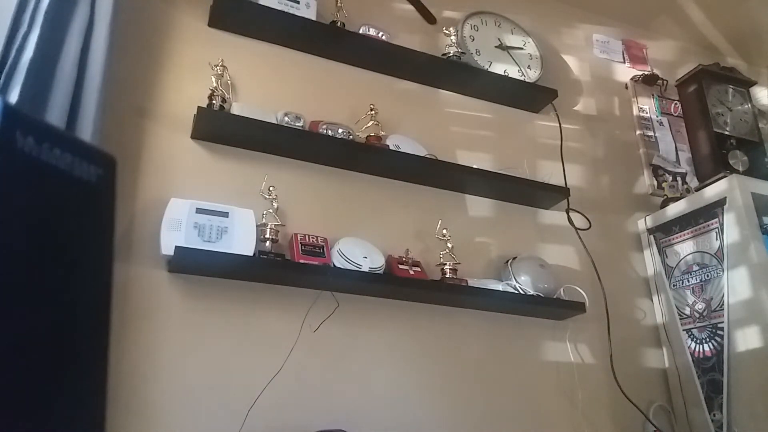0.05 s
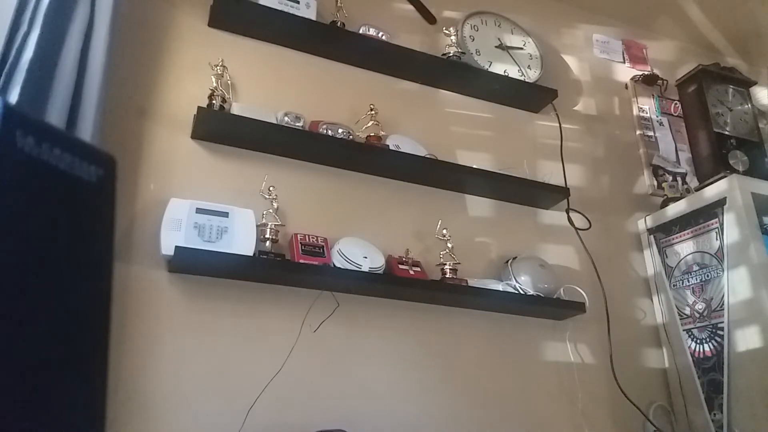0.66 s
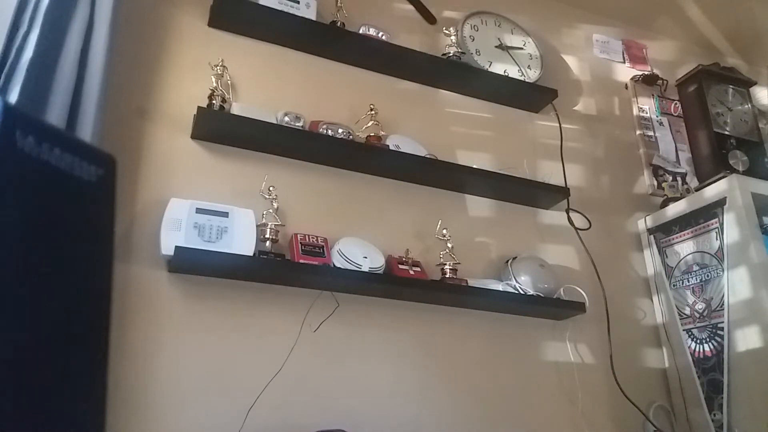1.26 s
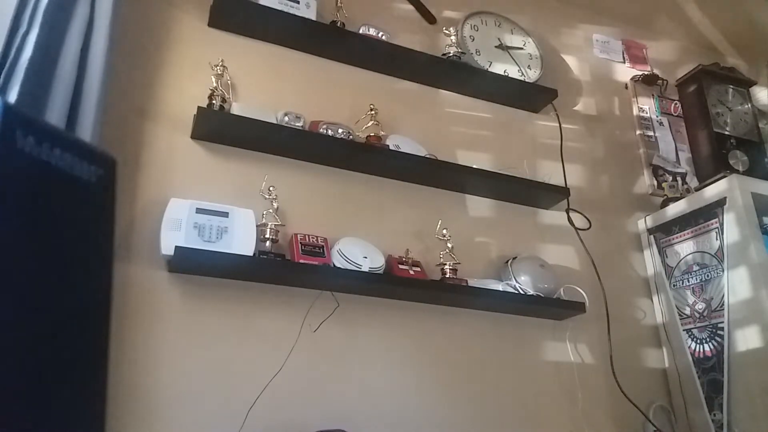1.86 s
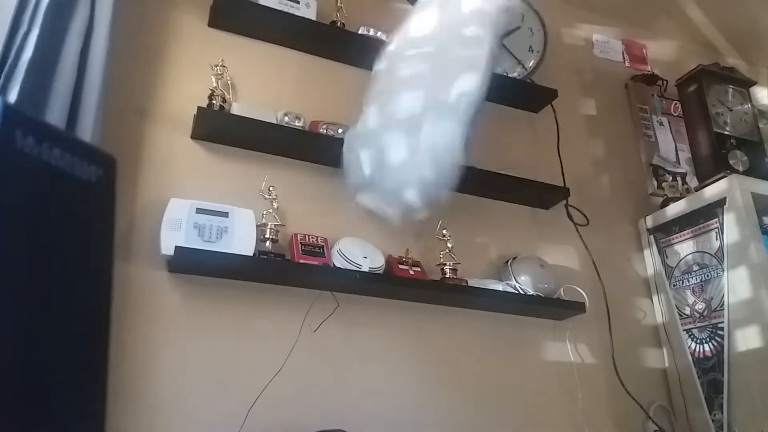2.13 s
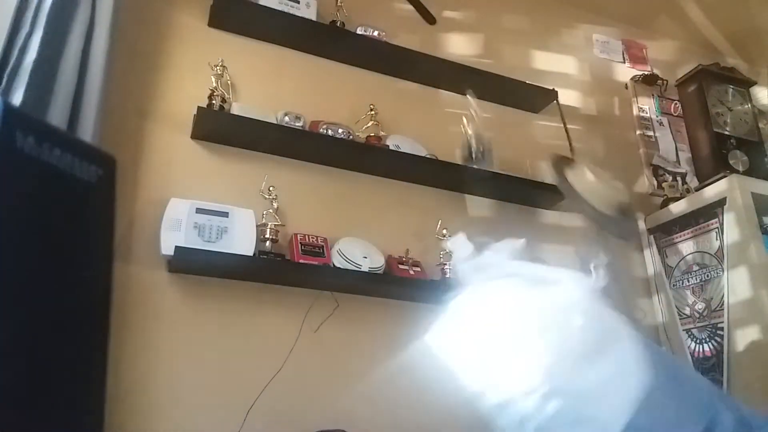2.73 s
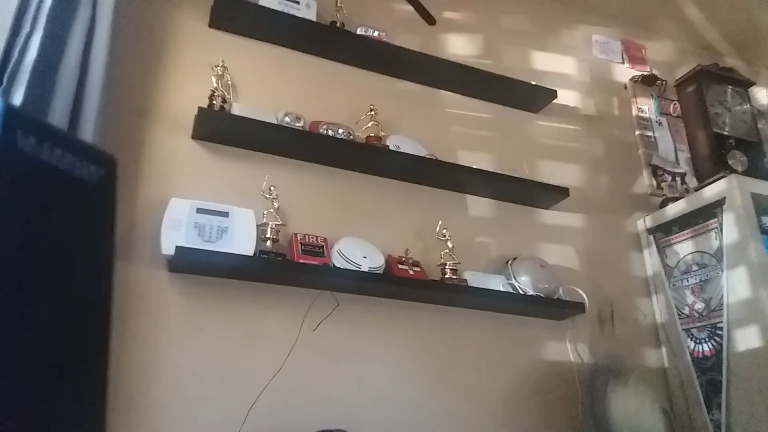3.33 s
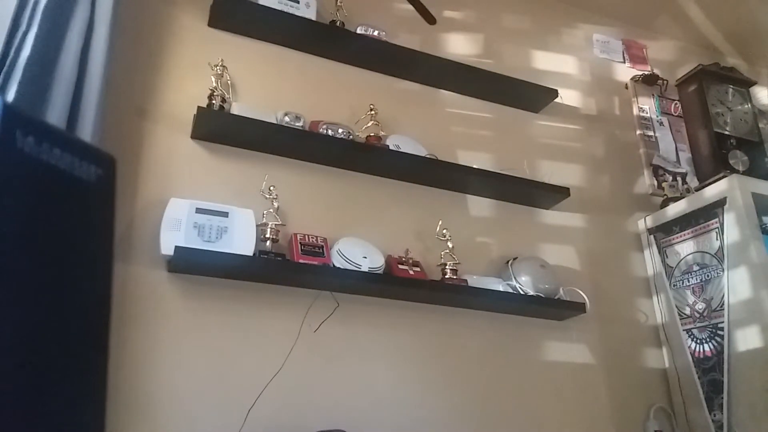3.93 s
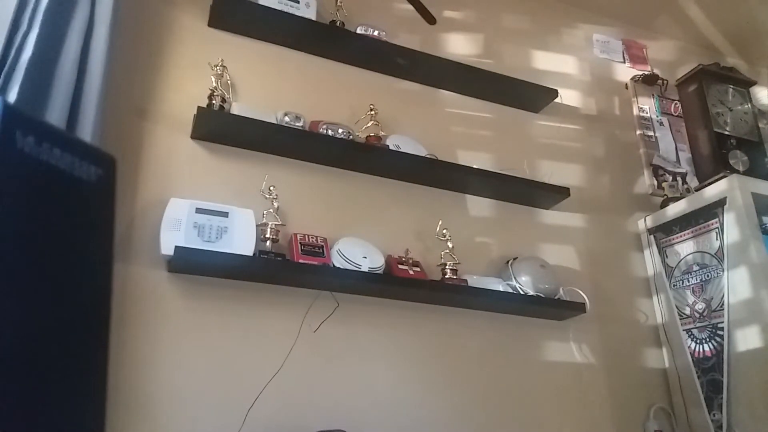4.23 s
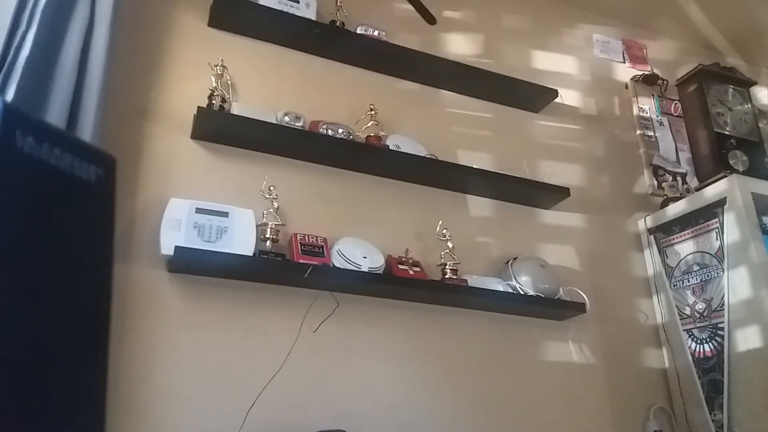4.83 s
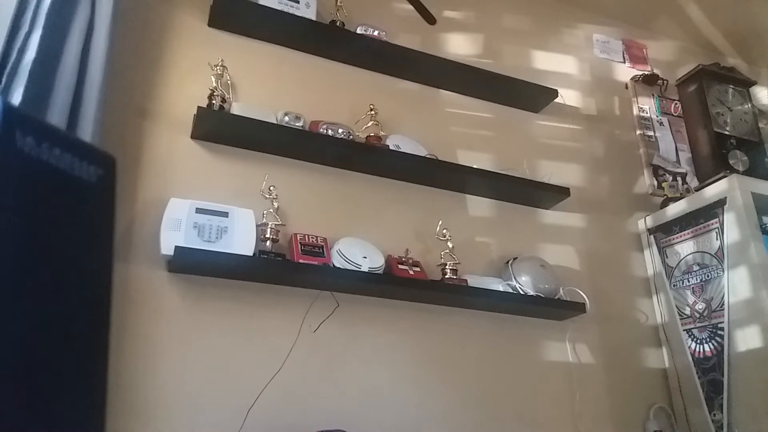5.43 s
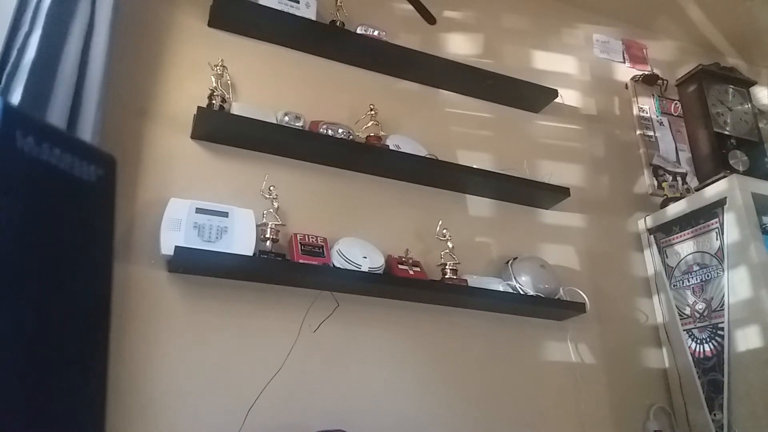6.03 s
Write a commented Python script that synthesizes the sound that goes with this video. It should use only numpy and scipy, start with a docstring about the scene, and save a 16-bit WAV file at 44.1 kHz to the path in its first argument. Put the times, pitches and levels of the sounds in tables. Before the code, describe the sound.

A faint fan hums, then trophies and a clock clatter off a wall shelf, landing with dull thuds and skittering plastic bits.

```python
"""A fan hums faintly in a small room. Then a pillow swipes a wall shelf: trophies and a wall clock knock
about, tumble past the lower shelves and land with dull thuds. Each knock rattles a hollow casing, booms
the shelf board and flexes the wall. Thin metal rings on, plastic parts crack and skitter, and showers
of fine debris settle."""
import sys
import numpy as np
from scipy import signal
from scipy.fft import rfft, irfft, next_fast_len
from scipy.io import wavfile

SR = 44100
rng = np.random.default_rng(int(sys.argv[2]) if len(sys.argv) > 2 else 0)


def transcribe(signal):
    """Save signal, clipped to [-1, 1], as a 16-bit WAV file at the path in sys.argv[1]."""
    frames = np.atleast_2d(signal).T
    limited = np.clip(frames, -1, 1)
    pcm = np.round(limited * 32767).astype(np.int16)
    wavfile.write(sys.argv[1], SR, pcm)


N = 267995
TIME_S = np.arange(N) / SR
SIZE, LEAD = 24000, 400  # samples: one event, head start of a graze
AGE_S = np.arange(SIZE) / SR


def undb(db):
    """Decibels to gain."""
    return 10 ** (np.asarray(db) / 20)


def curve(points, hz):
    """Gain of (Hz, dB) points on a log-frequency axis."""
    f, db = np.transpose(points)
    return undb(np.interp(np.log(hz), np.log(f), db))


def bins(size=SIZE):
    """Bin frequencies, floored at 1 Hz."""
    return np.maximum(np.arange(size // 2 + 1) * SR / size, 1)


def causal(gain):
    """Minimum-phase filter: nothing sounds before the blow."""
    cepstrum = irfft(np.log(gain + 1e-6))
    cepstrum[1:SIZE // 2] *= 2
    cepstrum[SIZE // 2 + 1:] = 0
    return np.exp(rfft(cepstrum))


def level(x, db, size=1700):
    """Scale to an RMS of db over the first size samples."""
    return x * undb(db) / np.sqrt(np.mean(x[..., :size] ** 2))


def add(out, time_s, x):
    """Mix x in at time_s."""
    start = int(time_s * SR)
    out[:, start:start + x.shape[1]] += x[:, :N - start]


def resonate(hz, db, t60_s):
    """Spectrum of damped modes, each peaking at its dB."""
    hz, db, t60_s = (np.asarray(column)[:, None] for column in (hz, db, t60_s))
    f = bins()
    loss = f * np.log(1000) / (np.pi * t60_s)
    gain = undb(db) * rng.choice([-1, 1], hz.shape)
    return np.sum(gain * loss / (loss + 1j * (f * f - hz * hz)), axis=0)


def struck(modes, scatter_db, detune):
    """Each blow lands elsewhere and reweights the modes."""
    hz, db, t60_s = np.transpose(modes)
    shift, weight = rng.standard_normal((len(hz), 2)).T
    return resonate(hz * (1 + detune * shift), db + scatter_db * weight, t60_s)


def contact(chatter_s, bounce, graze, count=24):
    """Force spectrum: light graze, full blow, uneven fading rebounds."""
    jitter, strength, approach = rng.random((count, 3)).T
    delay = 2.4 * (np.arange(count) + jitter) / count
    size = (.5 + strength) * rng.choice([-1, 1], count)
    rebound_at = LEAD + np.clip(delay * chatter_s * SR, 1, SIZE // 2).astype(int)
    force = np.zeros(SIZE)
    force[LEAD] = 1
    np.add.at(force, rebound_at, bounce * np.exp(-delay) * size)
    np.add.at(force, (approach * LEAD).astype(int), graze * approach * size)
    return rfft(force)


# diffuse-field width: (frequency [Hz], side minus mid [dB])
STEREO_WIDTH = [(60, -25), (120, -18), (230, -18), (450, -4.5), (1000, -2), (3000, 1.5), (15000, 1.5)]
SIDES = np.array([[1], [-1]])  # left, right
def spread(pair, hz):
    """Mid and side spectra to stereo; long waves reach both microphones alike."""
    return pair[0] + SIDES * pair[1] * curve(STEREO_WIDTH, hz)


# channel balance: (frequency [Hz], left minus right [dB])
BALANCE = [(100, 3.5), (220, 1), (380, 8.5), (650, -2), (1200, 6.5), (2400, 0.7), (5000, 1.5), (10000, 5)]
def lean():
    """Left and right gain per bin."""
    return curve(BALANCE, bins()) ** (SIDES / 2)


def room(t60_s, direct_db, echoes_per_s=1500, fill_s=.014, treble_life=.49, damp_hz=8500):
    """Room response: direct sound, then echoes crowding into a tail whose treble dies first."""
    hz = bins()
    density = np.minimum(echoes_per_s / SR * (1 + (AGE_S / fill_s) ** 2), 1)
    echoes = rng.standard_normal((2, SIZE)) * (rng.random((2, SIZE)) < density) / np.sqrt(density)
    tail, short = (echoes * 1000 ** (-AGE_S / life_s) for life_s in (t60_s, t60_s * treble_life))
    treble = 1 / (1 + (damp_hz / hz) ** 4)
    pair = rfft(tail) * (1 - treble) + rfft(short) * treble
    pair /= np.linalg.norm(tail, axis=1, keepdims=True)
    return spread(pair, hz) + undb(direct_db)


# air noise: (frequency [Hz], relative level [dB])
FAN_AIR = [(20, -78), (45, -38), (62, -15), (85, -6), (170, -9.5), (235, -1.5), (400, -11.5), (660, -16),
           (820, -10.5), (1100, -15.5), (1350, -21.5), (1850, -20), (2700, -32), (3700, -34.5),
           (7200, -44.5), (9000, -57), (16000, -57.5)]
# hum lines: (frequency [Hz], relative level [dB])
FAN_TONES = [(231.5, -45.5), (732.1, -48.5), (818.3, -35), (1588, -51)]
# fan envelope: (time [s], gain [dB])
FAN_GAIN = [(0, -1), (2.7, 0), (3.6, -11.5), (4.4, -9), (4.9, -2), (5.4, -4.5), (5.9, -1)]
def fan(air_db=-38.5, tones_db=-48, line_width_hz=1.5, flicker_db=2, flicker_points=50):
    """Moving air with wavering tones; the level dips under the crash and returns."""
    size = next_fast_len(N, True)
    hz = bins(size)
    air, tones = (spread(rfft(rng.standard_normal((2, size))), hz) for _ in range(2))
    air = level(irfft(air * curve(FAN_AIR, hz), size), air_db, size)
    lines = sum(undb(db) / (1 + ((hz - f) / line_width_hz) ** 2) for f, db in FAN_TONES)
    tones = level(irfft(tones * lines, size), tones_db, size)
    wander = np.interp(TIME_S, np.linspace(0, N / SR, flicker_points), rng.standard_normal(flicker_points))
    gain_db = np.interp(TIME_S, *np.transpose(FAN_GAIN)) + flicker_db * wander
    return (air + tones)[:, :N] * undb(gain_db)


# debris showers: (time [s], level [dB], hold [s], fade [s])
DEBRIS_SHOWERS = [(1.652, -53.5, 0.095, 0.031), (1.946, -36.5, 0.017, 0.092), (2.163, -40, 0.093, .1),
                  (2.582, -22.5, 0.049, 0.034), (2.815, -26.5, 0.036, 0.11), (3.045, -27, 0.051, 0.13),
                  (3.41, -28, 0.04, 0.074), (3.66, -44.5, 0.28, 0.19), (4.47, -39.5, 0.2, 0.033),
                  (5.06, -46, 0.13, .07)]
def shower_envelope_db(swell_s=.015):
    """Showers of debris swell, hold and fade; their powers add."""
    power = np.zeros(N)
    for time_s, db, hold_s, fade_s in DEBRIS_SHOWERS:
        swell = np.clip((TIME_S - time_s) / swell_s, 0, 1)
        fade = np.exp(-np.maximum(TIME_S - time_s - swell_s - hold_s, 0) / fade_s)
        power += (undb(db) * swell * fade) ** 2
    return 10 * np.log10(power + 1e-12)


# small-part spectrum, shared with clicks: (frequency [Hz], gain [dB])
PART_COLOUR = [(400, 0), (1200, 5), (2100, 4.5), (3200, -2.5), (4200, 0), (5800, -4), (7200, 0.5),
               (8600, -6), (11000, 1), (13500, -5), (16000, -4)]
def rustle(debris_db, grains_per_s=900, scatter_db=3, dull_hz=7000, quiet_db=-42):
    """Tiny uneven contacts smeared by the room; harder ones are brighter."""
    sizes = rng.choice([-1, 1], N) * undb(scatter_db * np.minimum(rng.exponential(size=N), 3))
    grains = (rng.random(N) < grains_per_s / SR) * sizes
    response = irfft(causal(curve(PART_COLOUR, bins())) * room(t60_s=.1, direct_db=.5) * lean())
    bright = level(signal.fftconvolve(grains[None], response, axes=1)[:, :N], 0, N)
    dull = signal.sosfiltfilt(signal.butter(2, dull_hz, fs=SR, output="sos"), bright)
    hardness = .37 / (1 + undb(quiet_db - debris_db) ** 2)
    return (dull + hardness * (bright - dull)) * undb(debris_db)


def skittering_bits(debris_db, count=48, offset_db=-3.5, scatter_db=2, bright_hz=5800, chatter_s=.01):
    """Click rows for bigger bits: random times, level following the showers."""
    first_s = DEBRIS_SHOWERS[0][0]
    last_s, _, hold_s, fade_s = DEBRIS_SHOWERS[-1]
    span_s = last_s + hold_s + fade_s - first_s
    times_s = first_s + span_s * (np.arange(count) + rng.random(count)) / count
    rows = []
    for time_s, (loud, bright, right_db) in zip(times_s, rng.standard_normal((count, 3))):
        db = debris_db[int(time_s * SR)] + offset_db + scatter_db * loud
        rows.append((time_s, db, bright_hz * np.exp(.15 * bright), chatter_s, -right_db))
    return rows


# loose metal: (time [s], pitch [Hz], level [dB], t60 [s])
METAL_RINGS = [(1.921, 2153, -41.5, 0.12), (2.716, 1864, -36.5, 0.29)]
def metal_rings():
    """Thin metal rings on in one mode after a blow."""
    out = np.zeros((2, N))
    for time_s, hz, db, t60_s in METAL_RINGS:
        tone = irfft(resonate([hz], [0], [t60_s]))
        add(out, time_s, level(tone[None], db))
    return out


# cracking parts: (time [s], level [dB], brightness [Hz], chatter [s], treble left minus right [dB])
PART_CRACKS = [(2.372, -38.5, 4870, 0.0083, 1), (2.424, -39.5, 7000, 0.014, 5),
               (2.543, -33.5, 7300, 0.0088, -1), (2.569, -24, 3400, .012, 0), (2.62, -22, 5500, 0.026, -1),
               (2.756, -30, 7700, .016, 3), (2.85, -27.5, 6200, 0.034, 4), (2.879, -34, 8800, 0.0086, -2),
               (3.044, -23, 3460, .025, 3), (3.082, -29, 10000, 0.022, 17), (3.148, -33.5, 8900, 0.0038, 1),
               (3.216, -29.5, 5400, 0.035, -2), (3.292, -30, 5550, 0.028, 0), (3.4, -24, 6600, 0.024, 11),
               (3.448, -25.5, 5750, .024, 7), (3.527, -37.5, 5260, 0.028, 0), (3.743, -43, 5530, 0.021, 1),
               (3.819, -41, 5073, 0.0079, -1), (3.993, -47.5, 6417, 0.013, 0),
               (4.281, -50, 4940, 0.0082, -5), (4.474, -46.5, 3000, 0.0095, -8),
               (4.499, -25, 7500, 0.0087, 2.5), (4.691, -41.5, 7740, .009, 2),
               (4.753, -31.5, 8000, 0.0088, -2), (4.821, -36, 6900, 0.071, 2), (5.044, -35, 8200, .008, 4),
               (5.112, -39.5, 6760, 0.027, 4)]
def clicks(parts, t60_s=.012, shade_hz=6000, mode_count=12):
    """Each small part snaps with short modes of its own, then skitters."""
    out, hz = np.zeros((2, N)), bins()
    shade = 1 / (1 + (shade_hz / hz) ** 2)  # the microphone housing shades only short waves
    for time_s, db, bright_hz, chatter_s, pan_db in parts:
        pitch, weight, life = rng.random((mode_count, 3)).T
        modes = 1 + resonate(1600 * 9 ** pitch, 6 * weight - 6, t60_s * (.5 + life))
        band_loss = (1 + (bright_hz / hz / .66) ** 2) * (1 + (hz / bright_hz / .86) ** 4)
        colour = causal(curve(PART_COLOUR, hz) / np.sqrt(band_loss))
        path = room(t60_s=.27, direct_db=-5) * lean() * undb(SIDES * pan_db * shade / 2)
        force = contact(chatter_s, bounce=.8, graze=.26, count=16)
        add(out, time_s - LEAD / SR, level(irfft(force * modes * colour * path), db))
    return out


# heavy soft blows on wall, floor or furniture: (time [s], level [dB], pitch [Hz], swell [s])
PANEL_THUDS = [(1.972, -20, 98.3, .026), (2.08, -18.5, 93, .017), (2.226, -13.5, 88.4, 0.018),
               (2.572, -10, 84.3, 0.019), (2.623, -14, 81, 0.017), (3.061, -13.5, 94, 0.016),
               (3.392, -5.5, 91, 0.017), (3.515, -17, 100, .013), (3.528, -16, 285.5, .012),
               (4.475, -4.5, 89.6, .012), (4.496, -15.5, 176, 0.0084), (4.827, -25, 123, 0.016)]
def thuds(rumble_db=-13, stiffen=.66, stiff_s=.0025, wall_hz=87.7, wall_db=-6.5, wall_swell_s=.018):
    """A panel swells through a few slow cycles, stiffer at first contact; the room rumbles on."""
    out = np.zeros((2, N))
    # each knock also flexes the wall
    flexes = [(time_s, boom_db + wall_db, wall_hz, wall_swell_s) for time_s, _, boom_db, _, _ in HARD_KNOCKS]
    path = room(t60_s=.6, direct_db=-3)
    for time_s, db, hz, swell_s in PANEL_THUDS + flexes:
        pitch_hz = hz * (1 + stiffen * np.exp(-AGE_S / stiff_s))
        turns = np.cumsum(pitch_hz) / SR + SIDES * .01  # left leads
        envelope = (AGE_S / swell_s * np.exp(1 - AGE_S / swell_s)) ** 2
        swing = envelope * np.sin(2 * np.pi * turns)
        rumble = irfft(rfft(swing) * path)
        rumble *= undb(rumble_db) * swing.std() / rumble.std()
        add(out, time_s, undb(db) * (swing + rumble))
    return out


def with_hops(blows, hop_s=.102, hop_clack_db=-13, hop_boom_db=-6.5, brittle_hz=1670):
    """Each blow, then one weaker hop; hard contacts barely hop."""
    for time_s, clack_db, boom_db, hard_hz, chatter_s in blows:
        yield time_s, clack_db, boom_db, hard_hz, chatter_s
        loss_db = 20 * np.log10(1 + (hard_hz / brittle_hz) ** 4)
        clack_db += hop_clack_db - loss_db
        boom_db += hop_boom_db - loss_db
        yield time_s + hop_s, clack_db, boom_db, hard_hz, chatter_s


# shelf board: (frequency [Hz], relative level [dB], t60 [s])
BOARD_MODES = [(150.5, -5.5, 0.072), (209.7, -4, 0.19), (233.4, -1.5, 0.16), (286.7, -5, 0.2),
               (314, -16.5, 0.044)]
# hollow casings: (frequency [Hz], relative level [dB], t60 [s])
CASING_MODES = [(417, -1.5, 0.12), (487, -3.5, 0.082), (596, -12, 0.25), (770, 0, 0.16), (908, 6.5, 0.017),
                (973, -2, 0.043), (1080, -20, 0.07), (1135, 5, 0.056), (1245, -18, 0.034), (2013, 5, 0.36),
                (2060, 4, 0.08), (4090, 3, 0.044)]
# clack spectrum: (frequency [Hz], gain [dB])
CASING_COLOUR = [(150, -5), (300, 3.5), (480, 10.5), (1100, 4.5), (1550, 0), (2100, 0.5), (3200, -2.5),
                 (4300, -2.5), (8000, -6.5), (16000, -12)]
# hits on shelves, wall and floor: (time [s], clack [dB], boom [dB], hardness [Hz], chatter [s])
HARD_KNOCKS = [(1.74, -41, -40.5, 1600, .027), (1.921, -32.5, -40, 2600, 0.012),
               (1.967, -19.5, -23.5, 1100, 0.013), (1.985, -11.5, -15.5, 1330, .009),
               (2.186, -22, -20, 1230, 0.021), (2.226, -20, -22, 1650, 0.02),
               (2.292, -21, -31.5, 1564, 0.0057), (2.368, -20.5, -21, 1400, .014),
               (2.421, -21, -18.5, 2370, .009), (2.437, -19, -41, 1370, 0.015),
               (2.502, -21.5, -27.5, 1670, 0.011), (2.569, -14.5, -17.5, 2440, .009),
               (2.592, -14.5, -16, 2900, 0.023), (2.809, -24.5, -23.5, 3170, 0.0059),
               (2.841, -13.5, -14.5, 1600, .02), (2.903, -21, -22.5, 1640, .023),
               (2.94, -35.5, -17.5, 1200, 0.024), (3.003, -16.5, -22, 1550, 0.024),
               (3.043, -13.5, -21, 3340, .011), (3.067, -16, -19, 1900, .02), (3.106, -15, -21, 1540, .016),
               (3.394, -23.5, -17.5, 2100, .017), (3.519, -26, -27, 1900, 0.017),
               (4.495, -31.5, -24.5, 2900, .018), (4.828, -28.5, -24.5, 2000, 0.03),
               (5.089, -23.5, -23, 1300, 0.0058)]
def knocks(treble_slope=3.23, crack_db=1):
    """Each blow rattles a casing and booms the board; softer contact loses treble."""
    out, hz = np.zeros((2, N)), bins()
    board_band = causal(1 / (1 + (hz / 600) ** 2 + (130 / hz) ** 4))
    for time_s, clack_db, boom_db, hard_hz, chatter_s in with_hops(HARD_KNOCKS):
        colour = causal(curve(CASING_COLOUR, hz) / np.sqrt(1 + (hz / hard_hz) ** treble_slope))
        casing = struck(CASING_MODES, scatter_db=2.5, detune=.0089) + undb(crack_db)
        casing *= colour * contact(chatter_s, bounce=.46, graze=.25)
        board = struck(BOARD_MODES, scatter_db=4, detune=.0062)
        board *= board_band * contact(chatter_s, bounce=.43, graze=.021)
        clack = irfft(lean() * casing * room(t60_s=.29, direct_db=-3.5))
        boom = irfft(lean() * board * room(t60_s=.33, direct_db=5.5))
        add(out, time_s - LEAD / SR, level(clack, clack_db) + level(boom, boom_db))
    return out


def scene():
    """Everything that falls, over the fan."""
    debris_db = shower_envelope_db()
    mix = fan() + knocks() + thuds()
    return mix + clicks(PART_CRACKS + skittering_bits(debris_db)) + rustle(debris_db) + metal_rings()


def record(dry, low_cut_hz=42, top_hz=16000):
    """Low cut, soft clip, steep top cut."""
    thinned = signal.sosfilt(signal.butter(3, low_cut_hz, "high", fs=SR, output="sos"), dry)
    rounded = thinned / (1 + thinned ** 6) ** (1 / 6)
    return signal.sosfilt(signal.ellip(10, .2, 80, top_hz, fs=SR, output="sos"), rounded)


dry = scene()
out = record(dry)
transcribe(out)
```